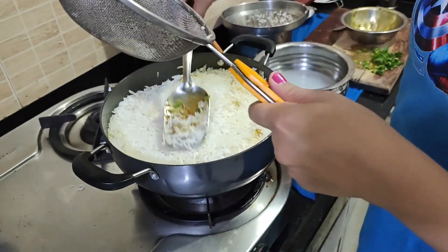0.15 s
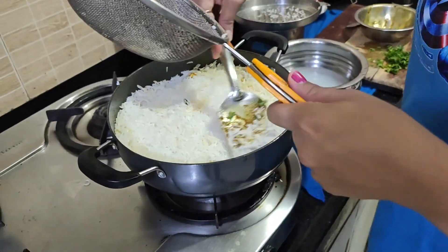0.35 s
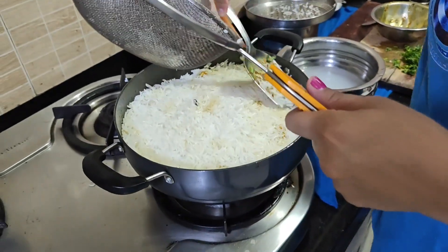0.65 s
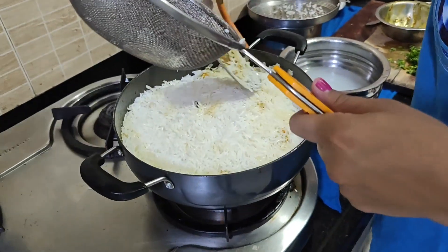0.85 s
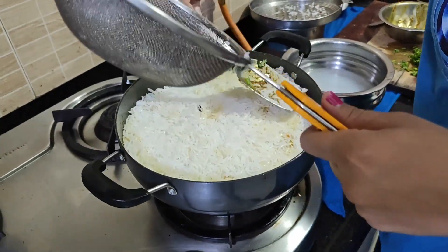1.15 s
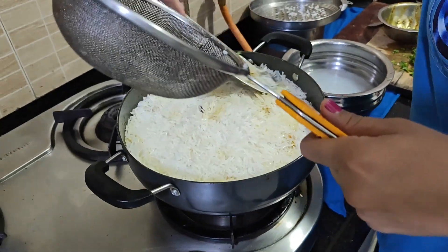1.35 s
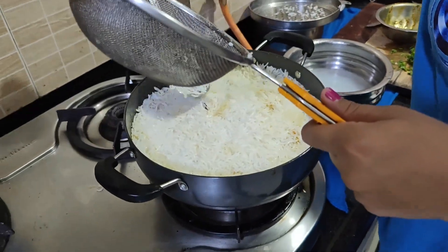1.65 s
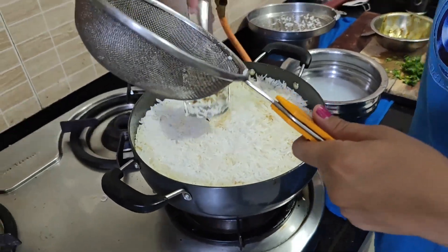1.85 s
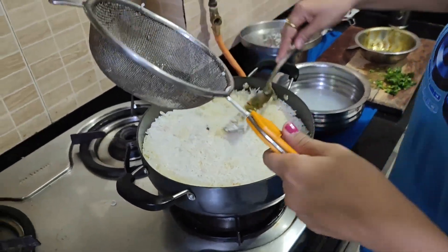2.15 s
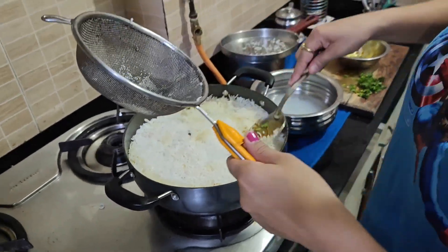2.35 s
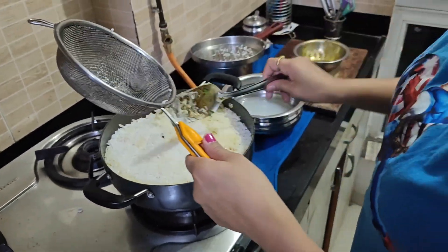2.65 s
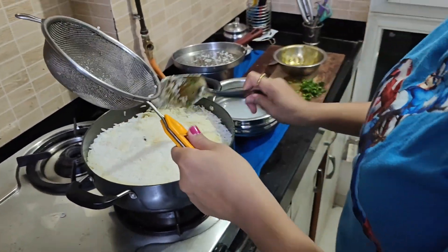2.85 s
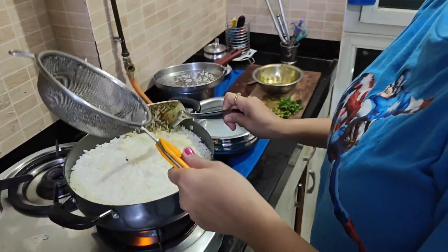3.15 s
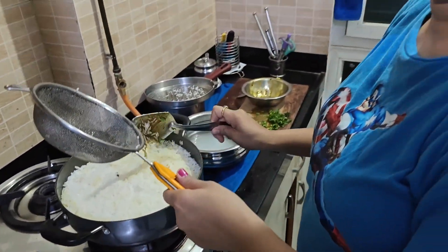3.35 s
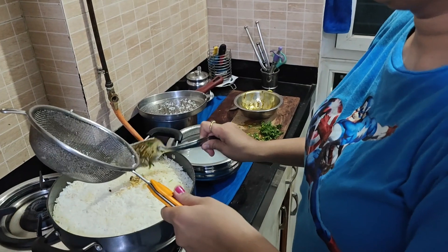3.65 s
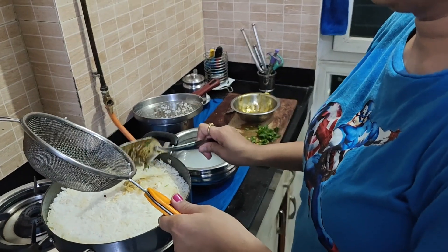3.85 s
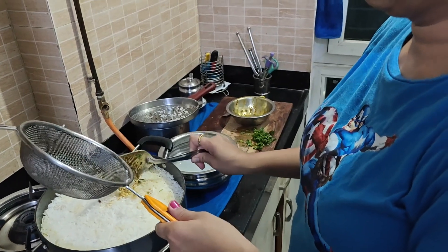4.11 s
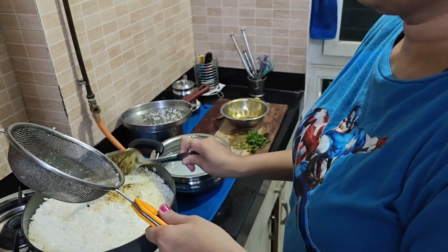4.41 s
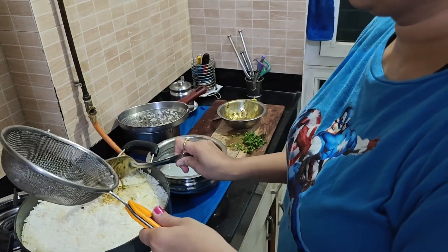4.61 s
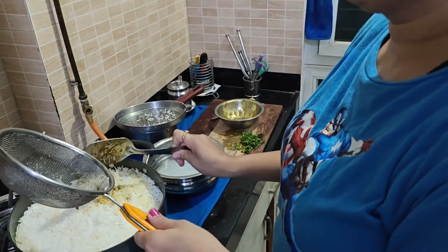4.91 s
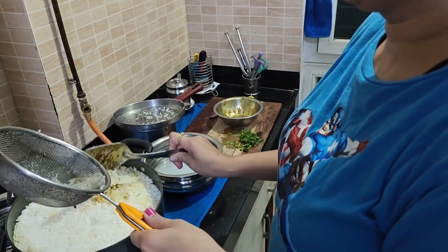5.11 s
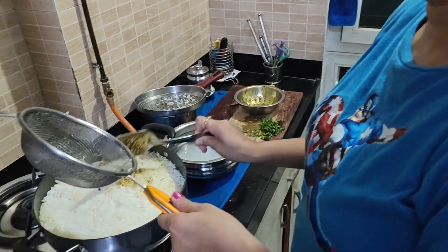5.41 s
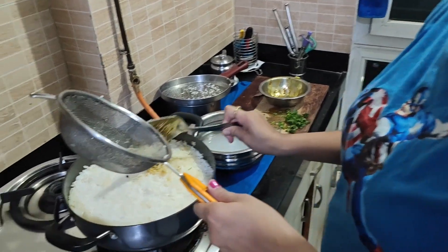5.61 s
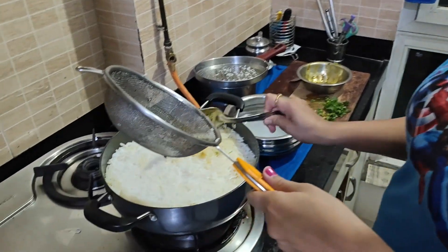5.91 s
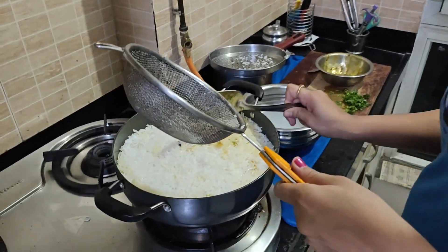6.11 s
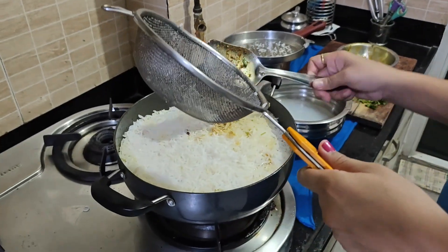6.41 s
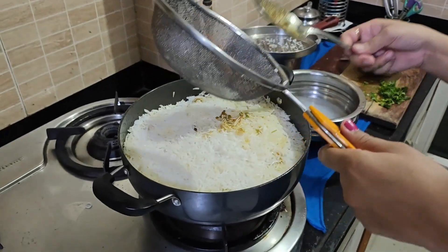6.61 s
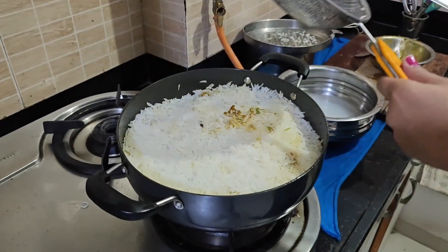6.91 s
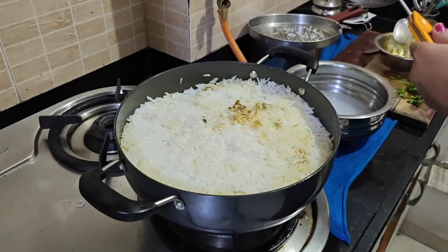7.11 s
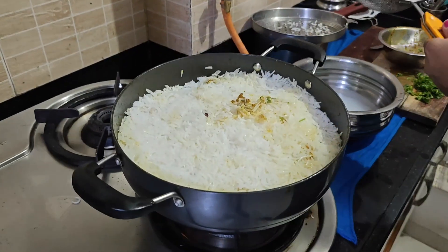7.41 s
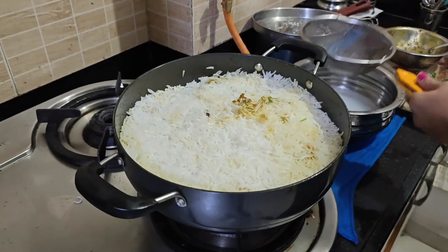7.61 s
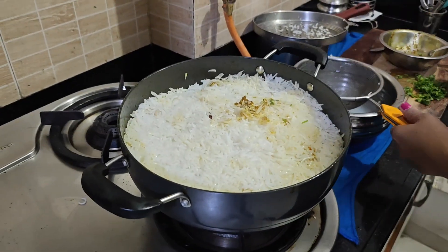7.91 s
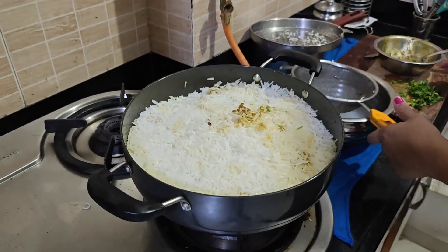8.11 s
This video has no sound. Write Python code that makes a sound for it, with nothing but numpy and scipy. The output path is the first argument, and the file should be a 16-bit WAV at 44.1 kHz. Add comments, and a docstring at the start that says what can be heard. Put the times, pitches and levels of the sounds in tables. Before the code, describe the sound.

A low, steady kitchen hum with faint hiss runs throughout, heard close by in a small, hard tiled room. At 0.3 s a spoon clinks lightly on a mesh strainer, with tiny ticks until 0.6 s, where a dull thud lands. Clearer single clinks come at 1.1 and 1.3 s, then a near pause with a soft thud at 2.2 s. From 2.8 to 6.0 s the spoon raps the strainer about nineteen times, evenly, every 0.17 to 0.18 s: loud, harsh rattling clanks with short metallic ring, low body and compressed peaks, varying slightly in force. The ring dies into the hum. At 7.25 s the spoon is set down with a small double clatter, followed by a soft thud at 7.5 s and faint metal touches near 7.65 s. Bright, ringing clanks at 7.8 and 8.1 s, with lighter contacts between and after, mark the strainer landing in a steel bowl.

```python
"""A steel spoon raps a mesh strainer in a quick run to knock food off into a pan, in a tiled kitchen.
Lighter clinks come before the run; after it, spoon and strainer are put down among steel bowls.
Each blow is a rattle of short-lived modes from filtered noise plus room reflections; metal adds ringing sines.
A few dull thuds and a low hum of shaped noise lie underneath.
The recorder's limiter flattens the top of every loud blow."""
import sys
import numpy as np
from scipy import signal
from scipy.fft import rfft, irfft
from scipy.io import wavfile
from scipy.ndimage import uniform_filter1d

SR = 44100
rng = np.random.default_rng(int(sys.argv[2]) if len(sys.argv) > 2 else 0)


def bounce(signal):
    """Save signal as a 16-bit WAV file at the path given by the first command-line argument."""
    frames = np.transpose(np.atleast_2d(signal))
    limited = np.clip(frames, -1, 1)
    pcm = np.round(limited * 32767).astype(np.int16)
    wavfile.write(sys.argv[1], SR, pcm)


N = 364244
RING_TIME = np.arange(SR) / SR   # one second of time, s


def from_db(db):
    """Decibels to gain."""
    return 10 ** (np.asarray(db) / 20)


def rms_one(x):
    """Scale to rms 1."""
    return x / np.sqrt(np.mean(x ** 2) + 1e-20)


def unit_energy(x):
    """Scale so that the squares sum to 1, averaged over the channels."""
    return rms_one(x) / np.sqrt(x.shape[-1])


def at_hz(points, hz):
    """Read a table along log frequency."""
    table_hz, value = np.transpose(points)
    return np.interp(np.log(np.maximum(hz, 1)), np.log(table_hz), value)


def bins(size):
    """Frequencies of a real FFT, in Hz."""
    return np.arange(size // 2 + 1) * SR / size


def fade(t60):
    """Exponential decay by 60 dB in t60 seconds."""
    return from_db(-60 * RING_TIME / t60)


def four_columns(table):
    """Columns that a table leaves out count as 0."""
    return [(*row, 0, 0)[:4] for row in table]


def add(out, start_s, sound):
    """Mix a sound in at start_s."""
    start = round(start_s * SR)
    out[:, start:start + sound.shape[1]] += sound[:, :N - start]


def colour(x, points, size=4096):
    """Causal (minimum-phase) filter with the given spectrum and unit power gain."""
    cepstrum = irfft(np.log(unit_energy(from_db(at_hz(points, bins(size))))))
    # folding the cepstrum forward in time gives minimum phase
    cepstrum[1:size // 2] *= 2
    cepstrum[size // 2 + 1:] = 0
    response = unit_energy(irfft(np.exp(rfft(cepstrum))))
    return signal.fftconvolve(x, response)[:len(x)]


# how alike the two microphones hear a diffuse sound: pitch_hz, correlation (-1 to 1)
MIC_LIKENESS = [(100, 0.96), (300, 0.94), (600, 0.61), (1000, 0.2), (1500, -0.29), (3000, 0.06)]


def diffuse(size):
    """Noise spectrum at two close microphones: alike in the bass, partly opposed near 1.5 kHz, unrelated above."""
    mid, side = rfft(rng.standard_normal((2, size)))
    alike = np.clip(at_hz(MIC_LIKENESS, bins(size)), -.99, .99)
    return np.sqrt(1 + alike) * mid + np.sqrt(1 - alike) * side * [[1], [-1]]


# how long the room rings in each band: pitch_hz, t60_s
ROOM_DECAY = [(100, 0.77), (300, 0.33), (800, 0.42), (2000, 0.36), (5000, 0.39), (15000, 0.25)]


def room_tail(build_s=0.0019, shared_db=-3.5, shared_t60=0.3):
    """Dense reflections: each band dies at its own rate, over one shared decay from hob and tiles."""
    noise, tail = diffuse(SR), 0
    for band_hz, t60 in ROOM_DECAY:
        share = at_hz([(hz, hz == band_hz) for hz, _ in ROOM_DECAY], bins(SR))
        decay = fade(t60) + from_db(shared_db) * fade(shared_t60)
        tail = tail + irfft(noise * share, SR) * decay
    return unit_energy(tail * (1 - np.exp(-RING_TIME / build_s)))


def blows(chatter_db, chatter_s, rebounds=6):
    """One main contact and a few weaker rebounds, as clicks."""
    clicks = np.zeros(SR)
    after_s = rng.uniform(.1, 1, rebounds) * chatter_s
    clicks[(after_s * SR).astype(int)] = from_db(chatter_db) * rng.choice([-1, 1], rebounds)
    clicks[0] = 1
    return clicks


def spread_click(t60, rise_s=0.00077, size=SR // 2):
    """Bending waves smear a click in time: even in the lows, with chance resonances in the treble."""
    envelope = fade(t60) * (1 - np.exp(-RING_TIME / rise_s))
    noise = rng.standard_normal(SR) * envelope
    burst = rfft(unit_energy(noise[:size]))
    evenness = np.clip(at_hz([(1500, 0.99), (5000, 0.42)], bins(size)), 0, 1)
    flattened = burst / (np.abs(burst) + 1e-12) ** evenness
    return unit_energy(irfft(flattened)[:size // 2])


def crashes(rows, spectrum, t60, direct_db, chatter_db, chatter_s, lag_s, bright_db, bright_slope=0):
    """Each blow rattles dense, short-lived modes; rattle and reflections partly renew as the hand moves."""
    out = np.zeros((2, N))
    room, body = room_tail(), spread_click(t60)
    usual_db = np.mean([row[1] for row in rows])
    for start_s, strength_db, *_ in rows:
        body = unit_energy(body + 1.84 * spread_click(t60))
        room = unit_energy(room + 1.05 * room_tail())
        rattle = signal.fftconvolve(blows(chatter_db, chatter_s), body)[:SR]
        crash = colour(rattle, spectrum) * np.sqrt(SR / 20)   # from unit energy to a working level
        late_right = np.interp(RING_TIME - lag_s, RING_TIME, crash, left=0)
        direct = np.array([crash, late_right])
        sound = signal.fftconvolve(crash[None], room)[:, :SR] + from_db(direct_db) * direct
        # a harder contact lifts the treble, by bright_slope dB for each dB of strength
        treble_db = bright_db + bright_slope * (strength_db - usual_db)
        treble = signal.lfilter(*signal.butter(1, 3500, "high", fs=SR), sound)
        shelved = sound + (from_db(treble_db) - 1) * treble
        add(out, start_s, from_db(strength_db) * shelved)
    return out


def ringing(rows, modes, t60, damping=0.2, scatter_db=0.0, contact_hz=30000, swell_s=0.0016, wobble=1.0):
    """Decaying sines weighted by the spot struck; reflections make them waver, differently on each side."""
    size, wobble_count = SR // 2, 36   # half a second of ring, with 36 changes of path
    out, t = np.zeros((2, N)), RING_TIME[:size]
    hz, level_db, spot_db, _ = np.transpose(four_columns(modes))
    level_db = level_db - 10 * np.log10(1 + (hz / contact_hz) ** 4)   # a soft contact misses the high modes
    lasts_s = t60 * (hz / np.median(hz)) ** -damping   # with damping, high modes die sooner
    rings = np.exp(2j * np.pi * hz[:, None] * t) * fade(lasts_s[:, None])[:, :size]
    rings = rings * (1 - np.exp(-t / swell_s))   # the ring swells as reflections arrive
    alike = np.clip(at_hz(MIC_LIKENESS, hz), 0, 1)[:, None]
    for start_s, strength_db, ring_db, spot in four_columns(rows):
        chance_db = scatter_db * rng.standard_normal(len(hz))
        strengths = from_db(strength_db + ring_db + level_db + spot * spot_db + chance_db)
        phases = np.exp(2j * np.pi * rng.random((2, len(hz), wobble_count + 1)))
        paths = phases[..., :1] + wobble * phases[..., 1:]   # the direct path plus changing reflections
        paths[1] = alike * paths[0] + np.sqrt(1 - alike ** 2) * paths[1]
        wavering = signal.resample(paths * strengths[:, None], size, axis=-1)
        add(out, start_s, (wavering * rings).imag.sum(axis=1))
    return out


def to_right(x, pan_db):
    """Make the right side louder than the left by pan_db."""
    return x * from_db(pan_db * np.array([[-1], [1]]) / 2)


# spectrum of the low hum: pitch_hz, relative level_db (per Hz)
HUM_COLOUR = [(22, -28), (45, -5.5), (64, 4), (118, -3.5), (175, -16), (280, -2.5), (420, -13), (650, -14),
              (1000, -18)]
# spectrum of the faint hiss: pitch_hz, relative level_db (per Hz)
HISS_COLOUR = [(900, -9.5), (1300, -5.5), (1600, -12.5), (2800, -14), (3600, -24), (8000, -25.5),
               (15800, -42.5)]
# resonances in the hum: pitch_hz, half_width_hz, level_db (rms of the layer)
HUM_RESONANCES = [(63, 8.5, -50), (305.5, 140, -63.5), (641.6, 46, -49.5)]


def background():
    """Low kitchen hum with a few resonances, and a faint hiss, all as steady shaped noise."""
    hz = bins(N)
    hum = from_db(at_hz(HUM_COLOUR, hz)) / (1 + (hz / 1100) ** 8)   # nothing much above 1.1 kHz
    hiss = from_db(at_hz(HISS_COLOUR, hz))
    layers = [(hum, -41), (hiss, -56.5)]   # shape, rms level_db
    for centre_hz, half_width_hz, level_db in HUM_RESONANCES:
        layers.append((1 / (1 + ((hz - centre_hz) / half_width_hz) ** 2), level_db))
    return sum(from_db(level_db) * rms_one(irfft(diffuse(N) * shape, N)) for shape, level_db in layers)


# dull thuds on the counter: start_s, strength_db
THUD_TIMES = [(0.614, -17), (2.166, -20.5), (4.335, -23.5), (5.622, -28.5), (5.800, -25), (7.497, -22)]
# spectrum of a thud: pitch_hz, relative level_db (per Hz)
THUD_SPECTRUM = [(80, -14), (150, -16), (235, 0), (500, 3.5), (760, -2.5), (1100, -15), (2500, -30.5),
                 (6000, -65)]


def thuds():
    """Blows on the counter: short, low-pitched vibration without any lasting ring."""
    return from_db(-6.8) * crashes(THUD_TIMES, THUD_SPECTRUM, t60=0.014, direct_db=-5.5, chatter_db=-16.5,
                                   chatter_s=0.044, lag_s=.00004, bright_db=-7.0)


# strainer set into a steel bowl: start_s, strength_db, ring_db, spot struck (about -1 to 1)
BOWL_TIMES = [(7.824, -15, -1.5, -1.27), (7.939, -25.5, -1.5, -0.065), (8.085, -14, -11, 0.94),
              (8.112, -26, 5.5, 0.61)]
# spectrum of the bowl's rattle: pitch_hz, relative level_db (per Hz)
BOWL_SPECTRUM = [(200, -9.5), (450, -13), (560, 2.5), (1000, 3), (1600, -9), (2700, 9), (3100, 2.5),
                 (4100, 5.5), (5700, -22), (6300, -4), (10500, 1.5), (13400, -14), (15600, 1.5)]
# lasting modes of the bowl: pitch_hz, level_db, spot_db (gained at spot 1)
BOWL_RING = [(1830, -10, -1), (1900, -14, 6), (2590, -12, -4.5), (2780, -7, 1), (2820, -2, 3),
             (3390, -7, 5), (3630, -7, -3), (3760, -9, -3), (4000, -8.5, -2), (4087, -4, -6),
             (4330, -11, 6), (5360, -16, 6), (6220, -10.5, 4), (6934, -17, 9), (7600, -8, -3),
             (10480, -8, 6), (13500, -10, 11), (14750, -13, -6)]


def bowl_hits():
    """The strainer lands in a steel bowl: a bright rattle and a strong ring."""
    rattle = crashes(BOWL_TIMES, BOWL_SPECTRUM, t60=0.052, direct_db=-4.0, chatter_db=-18.5,
                     chatter_s=0.018, lag_s=.00005, bright_db=2.5, bright_slope=0.35)
    ring = ringing(BOWL_TIMES, BOWL_RING, t60=0.28)
    return to_right(from_db(-2.5) * rattle + from_db(0.5) * ring, pan_db=1.5)


# spoon put down, then two faint metallic touches: start_s, strength_db, ring_db, spot struck (-1 to 1)
PUT_DOWN_TIMES = [(7.249, -21, 6, 0), (7.343, -30, 15, -0.2), (7.636, -43, 8, 0.96), (7.678, -49, 14, 0.86)]
# spectrum of these contacts' rattle: pitch_hz, relative level_db (per Hz)
PUT_DOWN_SPECTRUM = [(150, -19), (600, -2.5), (1200, -3), (1750, -10), (2100, -3), (2600, -10), (4100, -16),
                     (5200, -6.5), (8400, -10.5), (10700, -3.5), (13000, -15)]
# lasting modes of these contacts: pitch_hz, level_db, spot_db (gained at spot 1)
PUT_DOWN_RING = [(715, -4.5, -10), (974, -11), (2054, 0, -10), (2120, 1.5, -12), (2353, -12, 14),
                 (4490, -5), (6130, -11), (6860, -10, -5)]


def spoon_down():
    """The spoon is put down, then two faint metallic touches: rattles and rings, all modes decaying alike."""
    rattle = crashes(PUT_DOWN_TIMES, PUT_DOWN_SPECTRUM, t60=0.035, direct_db=-13.0, chatter_db=-16.5,
                     chatter_s=0.026, lag_s=.0001, bright_db=-5.5, bright_slope=0.49)
    ring = ringing(PUT_DOWN_TIMES, PUT_DOWN_RING, t60=0.32, damping=0)
    return to_right(from_db(-1.5) * rattle + from_db(-18.0) * ring, pan_db=2.5)


# spoon touching the strainer while scooping: start_s, strength_db, ring_db, spot struck (-1 to 1)
CLINK_TIMES = [(0.293, -19, 7.5, 0), (0.405, -32, 13, 1), (0.478, -32, 8, 1), (0.5225, -34, 8, 1),
               (0.548, -33, 8, 1), (0.570, -32, 5), (1.136, -16.5, 14.5, -1), (1.337, -22.5, 5, 0)]
# spectrum of a clink's rattle: pitch_hz, relative level_db (per Hz)
CLINK_SPECTRUM = [(150, -15.5), (550, -6.5), (850, 2), (1500, 2), (1850, 7.5), (3100, 5), (3600, -2),
                  (5200, -1.5), (8600, -4.5), (11300, -1), (13000, -12.5), (15700, -7.5)]
# lasting modes of a clink: pitch_hz, level_db, spot_db (gained at spot 1)
CLINK_RING = [(1500, -12, 4), (1765, -8, 3), (1831, -7, -3), (2165, -3.5, -1), (2770, -4, -7),
              (2820, -1.5, -2.5), (3128, 1, 4), (3354, -8), (3945, -6, 2), (4290, -9.5), (4762, -7.5),
              (5045, -5), (5940, -7, -3), (6740, -8), (9850, -2), (11820, -3, -2)]


def clinks():
    """The spoon touches the mesh: a very short rattle, and a ring whose top is dulled by the soft contact."""
    rattle = crashes(CLINK_TIMES, CLINK_SPECTRUM, t60=0.012, direct_db=-4, chatter_db=-12.5,
                     chatter_s=.012, lag_s=0.00018, bright_db=-8.5, bright_slope=0.95)
    ring = ringing(CLINK_TIMES, CLINK_RING, t60=0.3, contact_hz=5000, wobble=0.99)
    return from_db(-2.0) * rattle + from_db(-15) * ring


# the spoon's own modes during the knocks: pitch_hz, level_db, spot_db (gained at spot 1)
SPOON_KNOCK_RING = [(2774, -8, -2), (2940, -7, -1.5), (3120, -6, 7)]
# contact shifting along the spoon, its ring damped by the end: start_s, ring_db, spot struck (-1 to 1)
SPOON_GRIP = [(2.84, 11, -0.82), (3.01, -1.5, 0.82), (3.52, 9, 1), (3.87, 0.5, 0.73), (4.04, 8, .5),
              (4.3, -3, 0), (6.05, -6.5, -0.089)]


def spoon_ring():
    """At every knock the spoon rings as freely as the hand lets it."""
    times, ring_db, spot = np.transpose(SPOON_GRIP)
    rows = [(s, db, np.interp(s, times, ring_db), np.interp(s, times, spot)) for s, db, *_ in KNOCK_TIMES]
    return ringing(rows, SPOON_KNOCK_RING, t60=0.25)


# brief modes of the strainer's rim: pitch_hz, level_db, spot_db (gained at spot 1)
RIM_CLANK = [(1383, -4), (1889, -4), (2120, 0), (2271, 2.5, 3.5), (2979, -1.5), (4400, -9), (4449, -1, -2),
             (10900, -6)]


def rim_clank():
    """The rim clanks briefly at each knock, more or less by how squarely it is hit."""
    along_rim = np.linspace(-1, 1, len(KNOCK_TIMES))   # the spot struck creeps along the rim
    rows = [(*row[:3], spot) for row, spot in zip(four_columns(KNOCK_TIMES), along_rim)]
    return ringing(rows, RIM_CLANK, t60=0.081, scatter_db=2.6)


# late metallic ringing after the knocks: pitch_hz, level_db, spot_db (gained at spot 1)
LATE_RING = [(380, -8.5), (630, -6.5), (825, -4.5, 2.5), (2228, -3, 3), (2640, -6), (4850, -7.5),
             (5062, -6.5), (5750, -8), (6546, -7.5), (8288, -11), (9342, -11), (9759, -9.5), (11310, -11),
             (14822, -14)]


def late_ring():
    """Late metallic ringing swells after each knock and lingers over a low boom."""
    along_rim = np.linspace(-1, 1, len(KNOCK_TIMES))
    rows = [(*row[:2], 0, spot) for row, spot in zip(KNOCK_TIMES, along_rim)]
    ring = ringing(rows, LATE_RING, t60=0.25, damping=0, swell_s=0.027)
    boom = ringing([row[:2] for row in KNOCK_TIMES], [(86, -13.5)], t60=0.63, wobble=0.75)
    return ring + boom


# the run of knocks, glancing or square: start_s, strength_db, clank_db (extra clank of the rim)
KNOCK_TIMES = [(2.8366, -6.5, -6.5), (3.014, -6, -5), (3.1758, -5.5, -4), (3.3594, -5.5, 3),
               (3.523, -6, -2), (3.698, -3.5, 5), (3.8743, -5.5, 3), (4.0412, -6), (4.2125, -7),
               (4.373, -9), (4.5504, -6.5), (4.7348, -7), (4.9134, -5), (5.0898, -5.5), (5.272, -5),
               (5.461, -2.2), (5.641, -4.5), (5.8436, -4.5), (6.044, -5, 5)]
# spectrum of a knock's rattle: pitch_hz, relative level_db (per Hz)
KNOCK_SPECTRUM = [(60, -20.5), (95, -0.5), (160, -17), (290, -3), (800, 2), (1550, -1.5), (2200, 5),
                  (3600, -4), (6500, 0), (7800, -8.5), (8800, -9.5), (9300, -3), (11200, -4), (13000, -9.5),
                  (15700, -6)]


def knocks():
    """The spoon raps the strainer: a hard rattle, the spoon's ring, the rim's clank and late ringing."""
    rattle = crashes(KNOCK_TIMES, KNOCK_SPECTRUM, t60=0.031, direct_db=-15, chatter_db=-17.5,
                     chatter_s=.04, lag_s=.0003, bright_db=-2.5, bright_slope=0.4)
    rings = from_db(-12.0) * spoon_ring() + from_db(-11.5) * rim_clank() + from_db(-10.5) * late_ring()
    return from_db(-3.5) * rattle + rings


# colour of each side: pitch_hz, balance_db (left minus right)
SIDE_BALANCE = [(80, 2), (300, .3), (800, 1.2), (1300, -2.2), (3000, -3.5), (6000, -2.8), (8500, .3),
                (11000, -1.8), (14500, 2.5)]


def scene():
    """All blows and the background, with the colour of each side."""
    total = background() + thuds() + bowl_hits() + spoon_down() + clinks() + knocks()
    side_db = at_hz(SIDE_BALANCE, bins(N)) * np.array([[1], [-1]]) / 2
    return irfft(rfft(total) * from_db(side_db), N)


def limiter(x, ceiling_db=-10.5, release_db_per_s=170, size=130):
    """Gain drops within about 3 ms when the short-time level passes the ceiling, then recovers steadily."""
    power = uniform_filter1d(np.mean(x ** 2, axis=0), size)
    over_db = np.maximum(10 * np.log10(np.abs(power) + 1e-12) - ceiling_db, 0)
    ramp_db = release_db_per_s * np.arange(N) / SR
    held_db = np.maximum.accumulate(over_db + ramp_db) - ramp_db   # each peak is let go at the release rate
    return x * from_db(-uniform_filter1d(held_db, size))


def record(dry):
    """Limiter, full-scale clip and a steep top cut."""
    top_cut = signal.ellip(12, .1, 80, 15700, fs=SR, output="sos")   # ripple dB, stopband dB, cutoff Hz
    return signal.sosfilt(top_cut, np.clip(limiter(dry), -1, 1))


dry = scene()
out = record(dry)
bounce(out)
```